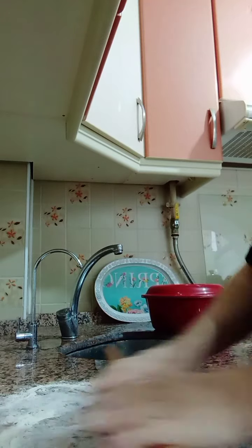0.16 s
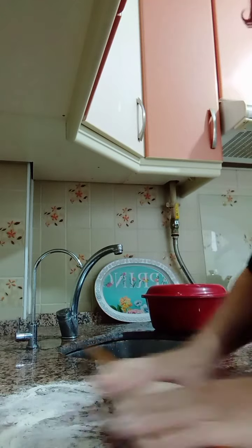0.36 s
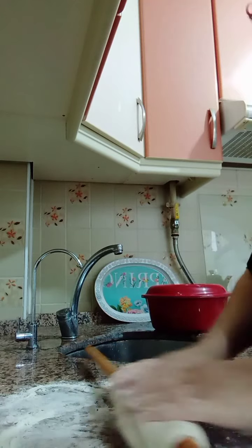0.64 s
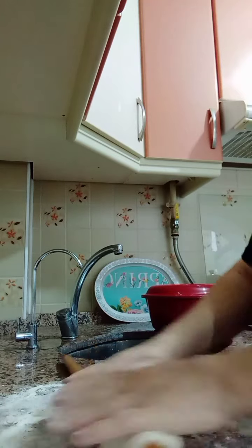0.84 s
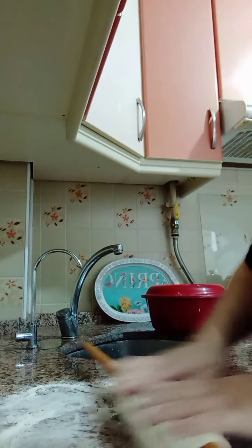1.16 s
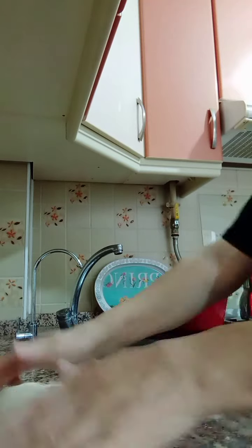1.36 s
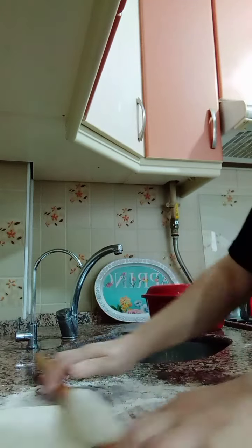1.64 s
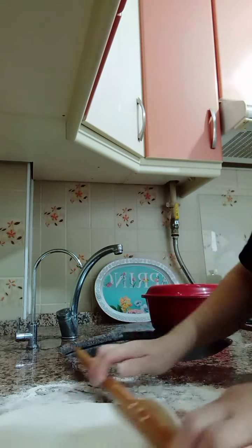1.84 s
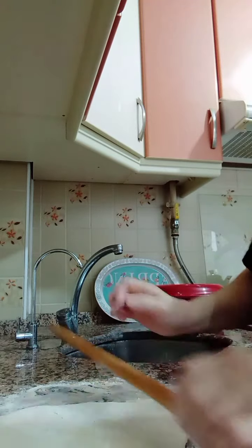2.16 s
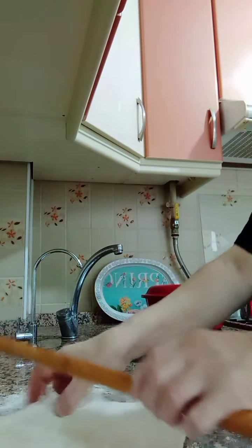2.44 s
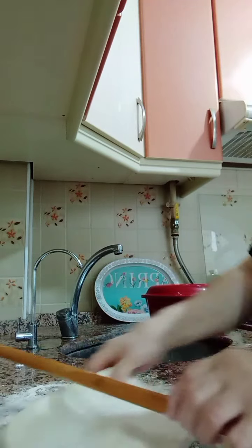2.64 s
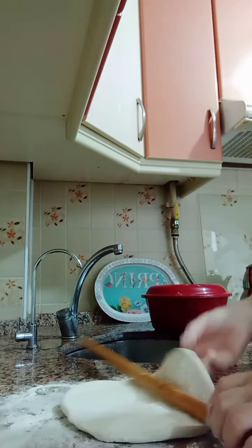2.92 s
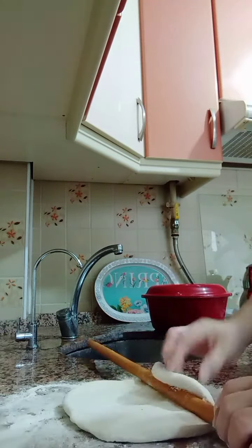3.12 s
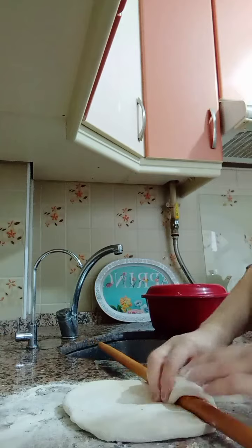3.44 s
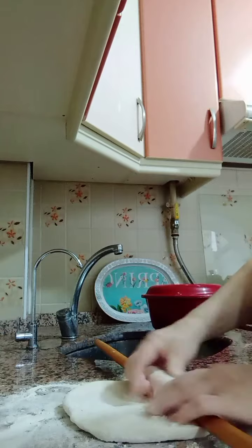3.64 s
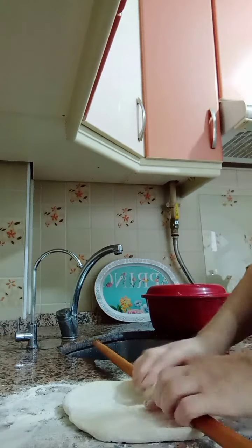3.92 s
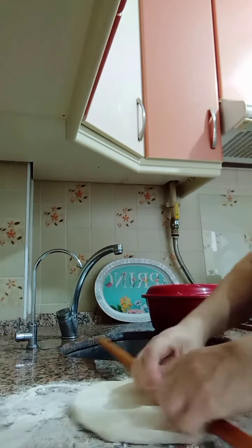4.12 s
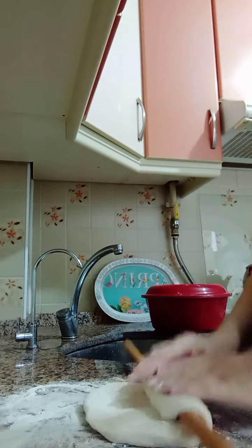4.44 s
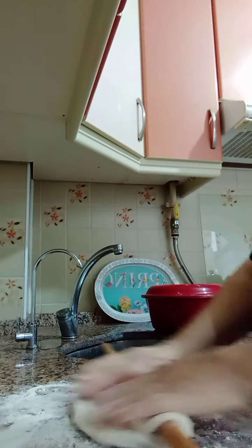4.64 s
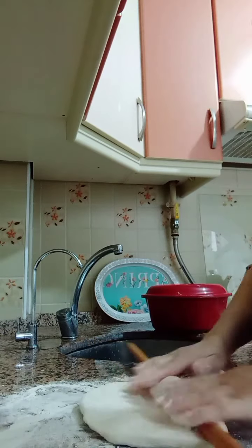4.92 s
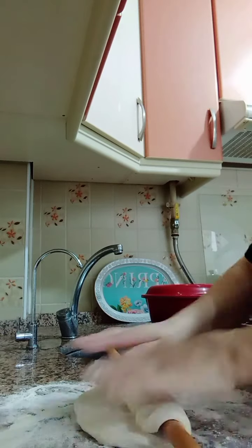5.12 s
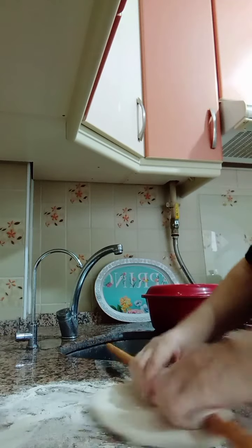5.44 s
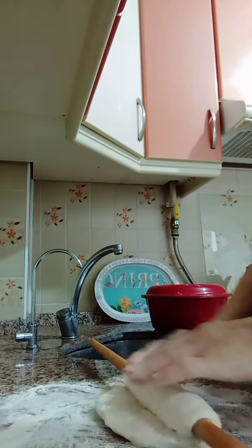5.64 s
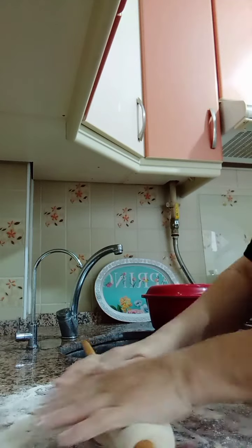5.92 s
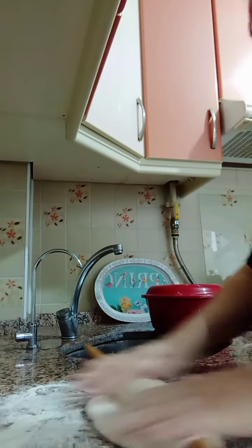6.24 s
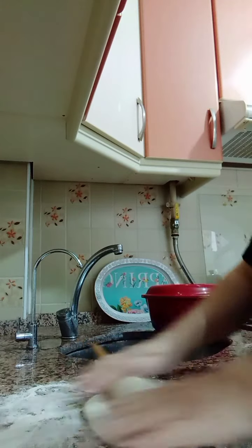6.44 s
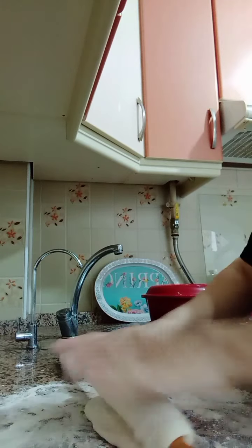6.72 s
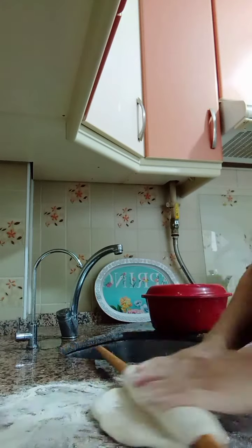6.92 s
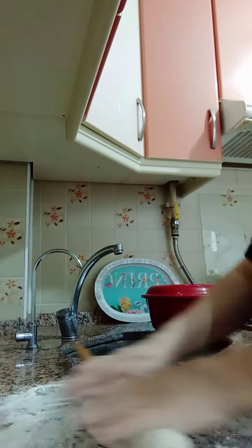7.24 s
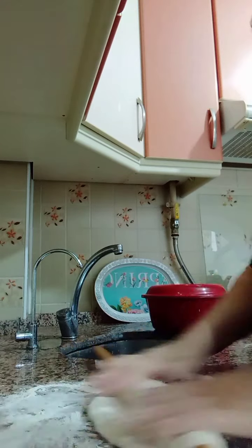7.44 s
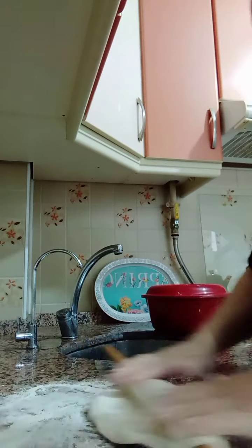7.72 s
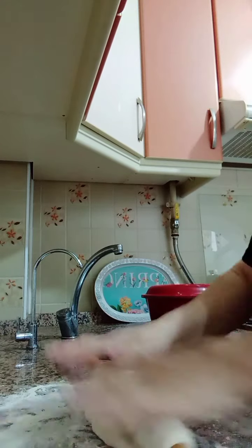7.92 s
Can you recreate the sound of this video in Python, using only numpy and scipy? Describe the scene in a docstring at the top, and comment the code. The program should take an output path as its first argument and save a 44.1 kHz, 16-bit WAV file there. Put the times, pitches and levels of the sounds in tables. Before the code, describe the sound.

Close in a small tiled kitchen, palms rub stiff dough around a wooden pin in quick, dry, floury strokes. In the first two seconds the pin's end clangs three times on a steel sink, with sharp knocks on stone between. Handling then turns looser, with dull thumps, before a hard rattling knock near five seconds and steady rolling to the end. A low appliance hum lies behind; the treble is dull.

```python
"""A small tiled kitchen: a long thin wooden pin rolls stiff dough on a floured stone counter.
Palms and dough rub drily at each stroke: shaped noise whose level rises and falls with the hand's speed.
The pin knocks on the stone (crack, bending modes, rattle); its end strikes the steel sink, which rings on.
Dull thumps fall alone or under the hard blows, and the room answers each impact with a diffuse tail.
Behind lie air, a low appliance hum and a deep rumble; the microphone is near and dull above 7 kHz."""
import sys
import numpy as np
from scipy import signal
from scipy.fft import rfft, irfft, next_fast_len
from scipy.io import wavfile
from scipy.ndimage import uniform_filter1d, minimum_filter1d, map_coordinates

SR = 44100
rng = np.random.default_rng(int(sys.argv[2]) if len(sys.argv) > 2 else 0)


def undo_db(level):
    """Turn decibels back into plain size, where 20 dB means ten times bigger."""
    steps = np.asarray(level, float) / 20
    return 10 ** steps


def digitize_waveform(pressure):
    """Quantize a signal to 16-bit integers and store it at the path in sys.argv[1].

    Rows of a 2-D input are taken as channels; values are limited to [-1, 1].
    """
    field = np.atleast_2d(pressure).T
    bounded = np.clip(field, -1, 1)
    quanta = np.round(bounded * 32767).astype(np.int16)
    wavfile.write(sys.argv[1], SR, quanta)


N = 355887

# spectrum of the finest flour dust and the microphone's hiss: (frequency [Hz], relative density [dB])
DUST_SPECTRUM = [(7000, -10.5), (12000, -15), (13800, -17.5), (14800, -1.5), (15800, -5)]
# spectrum of a hard contact: (frequency [Hz], gain [dB])
CRACK_SPECTRUM = [(100, -38), (500, -12), (1500, -8.5), (3000, 4), (5600, 5), (6500, -5.5), (7500, -20.5),
                  (8600, -38.5), (9600, -37), (11500, -52), (15000, -55.5)]


def unit(x):
    """Scaled to rms 1."""
    return x / np.sqrt(np.mean(x ** 2) + 1e-20)


def along(points, hz):
    """(Hz, value) points read on a log frequency axis."""
    f, v = np.transpose(points)
    return np.interp(np.log(hz + 1), np.log(f + 1), v)


def wobble(rate_hz):
    """A smooth random curve, rate_hz knots a second."""
    knots = rng.standard_normal(int(N * rate_hz / SR) + 4)
    return map_coordinates(knots, [np.arange(N) * rate_hz / SR])


def band(size, hz, width_hz, order):
    """Noise in one band, rms 1."""
    f = np.fft.rfftfreq(size, 1 / SR)
    noise = rfft(rng.standard_normal(size))
    return unit(irfft(noise / (1 + (2 * (f - hz) / width_hz) ** order), size))


def coloured(x, spectrum):
    """x through a minimum-phase filter, so no sound precedes its contact."""
    m = 2 * next_fast_len(len(x) // 2 + 4096)
    gain = undo_db(along(spectrum, np.fft.rfftfreq(m, 1 / SR)))
    cepstrum = irfft(np.log(gain), m)
    cepstrum[1:m // 2] *= 2  # fold onto positive time
    cepstrum[m // 2 + 1:] = 0
    return irfft(rfft(x, m) * np.exp(rfft(cepstrum)), m)[:len(x)]


def rustle(spectrum, grain_db, patchy_db):
    """Rubbing noise: uneven grains, with time-frequency patches of random gain, rms 1."""
    grains = rng.standard_normal(N) * undo_db(grain_db * wobble(900))
    z = signal.stft(grains, nperseg=512)[2]
    field = uniform_filter1d(rng.standard_normal(z.shape), size=6, axis=0)
    field = uniform_filter1d(field, size=8, axis=1)
    patchy = signal.istft(z * undo_db(patchy_db * unit(field)), nperseg=512)[1][:N]
    below, above = (spectrum[0][0] / 2, -120), (spectrum[-1][0] * 1.01, -120)
    return unit(coloured(patchy, [below] + spectrum + [above]))


def dulled(spectrum, hard_hz):
    """A softer contact loses the treble."""
    return [(hz, db - 10 * np.log10(1 + (hz / hard_hz) ** 4)) for hz, db in spectrum]


def tilted(rows, db_per_octave):
    """Levels tilted about 4 kHz: a brighter or duller blow."""
    return [(hz, db + db_per_octave * np.log2(hz / 4000), *rest) for hz, db, *rest in rows]


def chatter(t, length_s):
    """A first contact and the uneven bounces just after it."""
    contacts = rng.standard_normal(len(t)) ** 3 / 3 * np.exp(-(t / max(length_s, 3e-4)) ** 1.6)
    contacts[0] = 1.4
    return contacts


def ringing(modes, t, hard_hz, spread_db, rough_rad):
    """Modes struck at new strengths; a soft contact cannot drive the high ones, close neighbours make each waver."""
    hz, db, t60_s = np.transpose(modes)[:, :, None]
    level_db = db + spread_db * rng.standard_normal(hz.shape)
    size = undo_db(level_db - 60 * t / np.clip(t60_s, .02, .6)) / (1 + (hz / hard_hz) ** 2)
    knots = rng.standard_normal((len(modes), 40))
    waver = np.array([np.interp(t * 45, np.arange(40), row) for row in knots])  # 45 knots a second
    return np.sum(size * np.sin(2 * np.pi * hz * t + rough_rad * waver), axis=0)


def kitchen(x):
    """A fresh diffuse tail; each frequency dies at its own speed."""
    # reverberation: (frequency [Hz], t60 [s])
    t60_points = [(150, 0.56), (1000, 0.32), (4000, 0.39), (8000, 0.19)]
    hz, t, z = signal.stft(rng.standard_normal(SR // 2), SR, nperseg=256)
    decay = undo_db(-60 * t / along(t60_points, hz)[:, None])
    tail = signal.istft(z * decay, SR, nperseg=256)[1]
    tail = tail * (1 - np.exp(-np.arange(len(tail)) / SR / 0.0089))  # echoes thicken over the first walls
    return signal.fftconvolve(x, tail / np.linalg.norm(tail))[:len(x)]


def add(out, start_s, dry):
    """Places a sound with its own room tail."""
    out[round(start_s * SR):][:len(dry)] += dry + undo_db(-13.5) * kitchen(dry)


def strokes():
    """Each stroke speeds up and slows to a turn; flour hisses under the palms, the dough drags on the stone."""
    # strokes over flour: (start [s], length [s], hiss [dB], finest dust [dB], dough drag [dB])
    stroke_rows = [(-.12, 0.35, -53, -80, -55.5), (0.165, 0.24, -58.5, -83, -62),
                   (0.406, 0.25, -60.5, -84, -66.5), (.62, 0.26, -65, -78, -60),
                   (0.835, 0.22, -58.5, -84, -61.5), (1.02, 0.27, -64.5, -89, -61),
                   (1.225, 0.19, -49.5, -72.5, -63), (1.412, 0.23, -55.5, -80, -50.5),
                   (1.58, 0.49, -53, -77, -61), (1.78, 0.13, -50, -73, -69), (1.98, 0.093, -50.5, -73, -68),
                   (2.062, .11, -60, -76, -57), (2.202, 0.34, -61, -94, -58),
                   (2.434, 0.2, -54.5, -75.5, -56.5), (2.578, 0.48, -53, -76.5, -55),
                   (2.739, 0.11, -48, -80, -54.5), (2.895, 0.25, -58, -78, -73),
                   (3.184, 0.11, -63.5, -81, -65), (3.303, .15, -68.5, -86, -71),
                   (3.64, 0.14, -63, -79, -74), (3.77, 0.12, -63.5, -82, -79),
                   (3.958, 0.19, -65.5, -83, -72), (4.146, .26, -55.5, -79, -56.5),
                   (4.407, 0.29, -70.5, -87, -77), (4.591, 0.13, -59, -80, -62.5),
                   (4.647, 0.19, -52, -81, -60), (4.818, 0.088, -54, -80, -60),
                   (4.894, 0.17, -60, -84, -63), (5.051, 0.15, -52.5, -75, -66),
                   (5.319, 0.044, -55, -82, -72), (5.36, 0.16, -57, -81, -76),
                   (5.485, 0.16, -48.5, -82, -52), (5.606, 0.087, -50.5, -76, -59.5),
                   (5.781, 0.31, -53.5, -74, -71), (6.055, 0.22, -54.5, -79, -65),
                   (6.261, .19, -55, -76, -64), (6.474, 0.21, -60.5, -85, -64.5),
                   (6.638, .15, -58, -80, -71), (6.868, 0.03, -52.5, -79, -62),
                   (6.886, 0.21, -59, -77, -71), (7.064, 0.22, -54.5, -75, -65.5),
                   (7.27, 0.21, -55, -82, -61), (7.477, 0.24, -55, -79, -57),
                   (7.657, 0.21, -56.5, -83, -63.5), (7.893, 0.13, -56.5, -77.5, -78)]
    # hands never lie quite still, level between strokes: hiss, dust, drag [dB]
    resting_db = [-72.5, -92, -69]
    # flour under the palms: (frequency [Hz], relative density [dB])
    hiss_spectrum = [(300, -27), (1000, -16.5), (2500, -10), (4000, -1), (5500, 3.5), (6500, -5.5),
                     (7500, -20), (9000, -38), (12000, -42.5), (14000, -59)]
    # dough on stone: (frequency [Hz], relative density [dB])
    drag_spectrum = [(100, -25), (300, -9), (800, -5), (1600, -7.5), (3000, -6), (5000, -18), (7000, -57.5)]
    early, narrow = 0.81, 1.19  # early under 1 peaks before mid-stroke; larger narrow = narrower top
    power = np.ones((3, N)) * undo_db(resting_db)[:, None] ** 2
    t = np.arange(N) / SR
    for start_s, length_s, *layers_db in stroke_rows:
        on = slice(max(round(start_s * SR), 0), round((start_s + length_s) * SR))
        speed = np.sin(np.pi * np.clip((t[on] - start_s) / length_s, 0, 1) ** early) ** 2
        power[:, on] += undo_db(layers_db)[:, None] ** 2 * speed ** narrow
    hiss, dust, drag = np.sqrt(power)
    flutter = wobble(25)  # shared by flour and dust
    flour = hiss * undo_db(0.88 * flutter) * rustle(hiss_spectrum, grain_db=1.5, patchy_db=1.5)
    dough = drag * undo_db(1.1 * wobble(18)) * rustle(drag_spectrum, grain_db=1.5, patchy_db=1.5)
    fine = dust * undo_db(1.6 * flutter) * rustle(DUST_SPECTRUM, grain_db=0.9, patchy_db=1.8)
    return flour + dough + fine


def knocks():
    """The pin on stone: a crack, its bending modes and the dry rattle of wood held in the hands."""
    # knocks: (time [s], crack [dB], chatter [s], pin [dB], contact hardness [Hz])
    knock_rows = [(.162, -25, 0.0028, -41, 2500), (0.5976, -41, .002, -41.5, 3000),
                  (1.181, -20.5, 0.0097, -32, 3960), (1.394, -40, .003, -41, 3500),
                  (2.515, -44, 0.003, -65.5, 7000), (4.806, -33, 0.0053, -35, 3030),
                  (4.868, -39.5, 0.003, -60, 6000), (5.158, -16.5, 0.02, -29.5, 6050),
                  (5.332, -45.5, 0.0025, -68, 7000), (6.872, -67, 0.0016, -62, 6000)]
    # bending modes of the pin: (frequency [Hz], level [dB], t60 [s])
    pin_modes = [(174.3, -11, .2), (301, -9.5, 0.108), (441, -3, 0.13), (601, -7, 0.13), (652, 6, 0.06),
                 (758, -5.5, 0.11), (1108.5, 8, 0.077), (1530, 2.5, 0.089), (1650, -18.5, 0.06),
                 (2210, 2.5, .07), (2590, 0, 0.081), (3220, -6.5, 0.041), (3730, 3.5, 0.1),
                 (4545, 10.5, 0.041), (5170, -17.5, .05)]
    # rattling wood: (frequency [Hz], relative density [dB])
    wood_spectrum = [(100, -28.5), (400, -1), (1100, 3.5), (2500, 1), (5500, -5.5), (6500, -7.5),
                     (7500, -20), (10000, -56.5)]
    out, t = np.zeros(N + SR), np.arange(SR // 2) / SR
    for start_s, crack_db, chatter_s, pin_db, hard_hz in knock_rows:
        crack = undo_db(crack_db) * coloured(chatter(t, chatter_s), dulled(CRACK_SPECTRUM, hard_hz))
        wood = unit(coloured(rng.standard_normal(len(t)), dulled(wood_spectrum, hard_hz)))
        rattle = undo_db(2.0 - 60 * t / 0.17) * wood
        modes = ringing(pin_modes, t, hard_hz, spread_db=2.4, rough_rad=0.77)
        pin = undo_db(pin_db) * (modes + rattle) * (1 - np.exp(-t / 0.0003))
        add(out, start_s, crack + pin)
    return out[:N]


def clangs():
    """The struck rim passes its energy into the bowl; the pin rattles on against it, the modes shimmer."""
    # pin's end on the sink: (time [s], crack [dB], chatter [s], ring [dB], shimmer [dB], tilt [dB/octave])
    clang_rows = [(.597, -8, 0.00089, -60, -35, 1), (0.599, -9, 0.0024, -64, -44.5, 4.5),
                  (1.393, -11, 0.0069, -34.5, -32.5, -1), (2.061, -9, 0.0068, -34.5, -30.5, 2.5)]
    # modes of the sink: (frequency [Hz], level [dB], t60 [s], at most 0.6 s in the ring)
    sink_modes = [(447, -10, .3), (1082, -10.5, .4), (1435, -3, 0.4), (1520, -9, .43), (1907, -1, .5),
                  (2545, -3, .48), (2910, -6.5, .4), (3080, -2.5, 0.46), (3850, -1.5, 0.63),
                  (4490, -1.5, .45), (4750, -4.5, .3), (5340, 0.5, 0.26), (5550, -2.5, .35),
                  (5980, -3, .45)]
    # rattled bowl: (frequency [Hz], gain [dB])
    shimmer_spectrum = [(200, -18.5), (1000, -6), (2500, -8.5), (5400, -4.5), (6300, -16.5), (7500, -30),
                        (8600, -45), (9600, -46), (13000, -62)]
    blur_hz, between_db = 90, -7.5  # width of a mode under rattling, floor between modes
    rattle_db = 4  # unevenness of the rattle
    out, t = np.zeros(N + SR), np.arange(SR * 3 // 4) / SR
    f = np.fft.rfftfreq(len(t), 1 / SR)
    for start_s, crack_db, chatter_s, ring_db, shimmer_db, tilt_db in clang_rows:
        crack = undo_db(crack_db) * coloured(chatter(t, chatter_s), tilted(CRACK_SPECTRUM, tilt_db))
        modes = ringing(tilted(sink_modes, tilt_db), t, hard_hz=20000, spread_db=2, rough_rad=1.8)
        ring = undo_db(ring_db) * modes * (1 - np.exp(-t / 0.0051))
        ring = ring * np.exp(-(t / 0.24) ** 2)  # the counter damps the late ring
        rattle = rng.standard_normal(len(t)) * undo_db(rattle_db * wobble(500)[:len(t)])
        bowl = undo_db(between_db) + sum(undo_db(db) / (1 + 2j * (f - hz) / blur_hz) for hz, db, _ in sink_modes)
        rattled = irfft(rfft(rattle) * bowl, len(t))
        decay = undo_db(-60 * (np.hypot(t, .06) - .06) / 0.29)  # holds at first, then dies
        shimmer = undo_db(shimmer_db) * decay * unit(coloured(rattled, tilted(shimmer_spectrum, tilt_db)))
        add(out, start_s, crack + ring + shimmer)
    return out[:N]


def thuds():
    """A dull thump, alone or under a hard blow: a push at one pitch inside a puff of noise, with no ring."""
    # low thumps, some under the hard knocks and clang:
    # (time [s], level [dB], centre [Hz], noise width [Hz], noise t60 [s])
    thud_rows = [(.598, -45.5, 438, 450, 0.23), (1.5, -41.5, 199, 250, 0.1),
                 (4.249, -52.5, 186.4, 122, 0.44), (4.806, -47, 190, 120, 0.35),
                 (5.16, -45, 194, 150, 0.24), (6.28, -50, 204, 200, 0.42), (2.443, -44, 312, 300, 0.15),
                 (2.511, -48.5, 220, 200, .12), (2.763, -44, 300, 250, 0.16), (2.765, -50, 1154, 900, 0.17),
                 (3.206, -37, 736, 504, 0.073), (4.247, -39.5, 728, 400, 0.12),
                 (6.037, -51, 570, 900, 0.12), (6.276, -33.5, 680, 1310, 0.12),
                 (6.383, -50.5, 573, 700, 0.11)]
    out, t = np.zeros(N + SR), np.arange(SR // 2) / SR
    for start_s, db, hz, width_hz, t60_s in thud_rows:
        push = np.sin(2 * np.pi * hz * t) * undo_db(3 - 60 * t / t60_s / .6)  # dies sooner than the puff
        puff = undo_db(-1.0 - 60 * t / t60_s) * band(len(t), hz, width_hz, order=4)
        add(out, start_s, undo_db(db) * (1 - np.exp(-t / 0.0014)) * (push + puff))
    return out[:N]


def room_tone():
    """Still air as shaped noise, a hum of wavering narrow bands and a deep rumble."""
    # still air: (frequency [Hz], relative density [dB])
    air_spectrum = [(36, -29.5), (50, -13), (75, -11), (110, -2), (270, -11), (350, -7.5), (480, -18),
                    (800, -17.5), (1400, -26.5), (3100, -32), (5200, -24), (6000, -24.5), (7500, -42.5),
                    (9750, -70)]
    # appliance hum: (frequency [Hz], width [Hz], level [dB])
    hum_bands = [(113.7, 14, -65.5), (173, 12, -73), (229.3, 19, -77.5), (342.6, 26, -71), (393, 16, -77.5)]
    # deep rumble: (time [s], level [dB])
    rumble_levels = [(0, -75), (.6, -71), (1.35, -76.5), (2.5, -66.5), (3.5, -67), (3.82, -79), (4.15, -65),
                     (4.7, -78), (5.7, -77), (5.9, -71), (6.5, -78.5), (6.9, -72), (7.2, -79), (8.07, -84)]
    air = undo_db(-62.5 + 1.4 * wobble(1.2)) * rustle(air_spectrum, grain_db=-0.3, patchy_db=1.5)
    hum = sum(undo_db(db + 1.5 * wobble(2.28)) * band(N, hz, width_hz, order=2) for hz, width_hz, db in hum_bands)
    rumble_db = np.interp(np.arange(N) / SR, *np.transpose(rumble_levels))
    return air + hum + undo_db(rumble_db) * band(N, hz=49, width_hz=20, order=4)


def scene():
    """Everything on the counter and the room behind it, one channel."""
    return (strokes() + knocks() + clangs() + thuds() + room_tone())[None]


def limited(x):
    """The recorder's limiter: gain ducks around peaks to hold them at the ceiling."""
    ceiling, smoothing_ms = .63, 0.74
    span = round(smoothing_ms * SR / 1000)
    need = np.minimum(1, ceiling / (np.abs(x) + 1e-9))
    return x * uniform_filter1d(minimum_filter1d(need, 2 * span + 1), span)


def top_cut(x):
    """Nothing passes above the cut-off."""
    return signal.sosfilt(signal.butter(12, 16970, fs=SR, output="sos"), x)


def record(dry):
    """The microphone's faint own hiss, its band limits and the limiter."""
    heard = dry + undo_db(-92) * rustle(DUST_SPECTRUM, grain_db=3.0, patchy_db=0.5)
    heard = signal.sosfilt(signal.butter(6, 38, "highpass", fs=SR, output="sos"), heard)
    heard = signal.sosfilt(signal.ellip(8, .5, 50, 15900, fs=SR, output="sos"), heard)
    return top_cut(limited(heard))


dry = scene()
out = record(dry)
digitize_waveform(out)
```